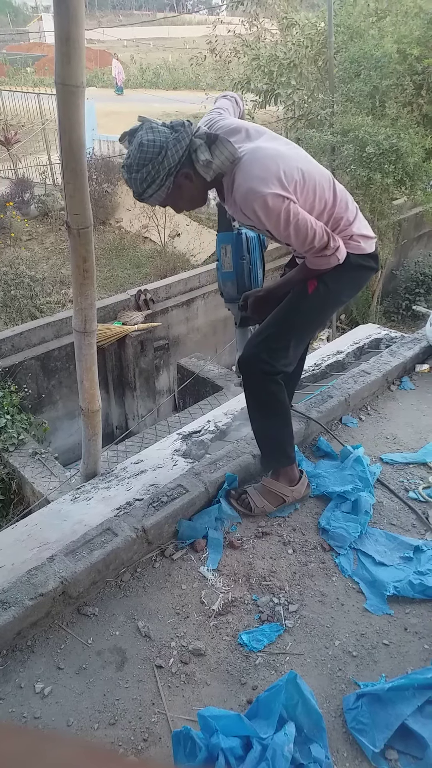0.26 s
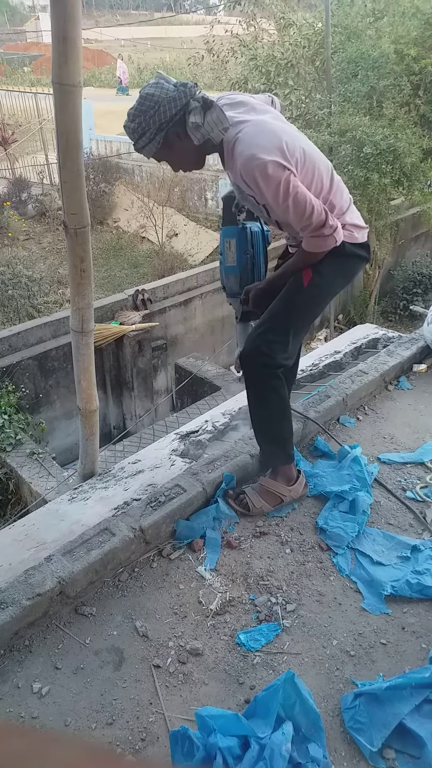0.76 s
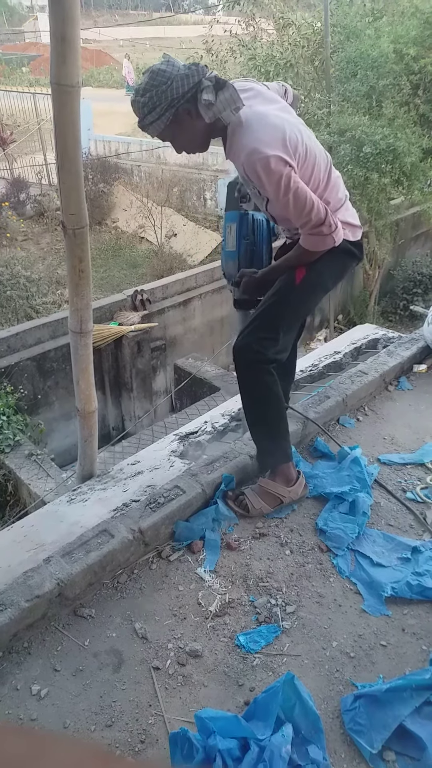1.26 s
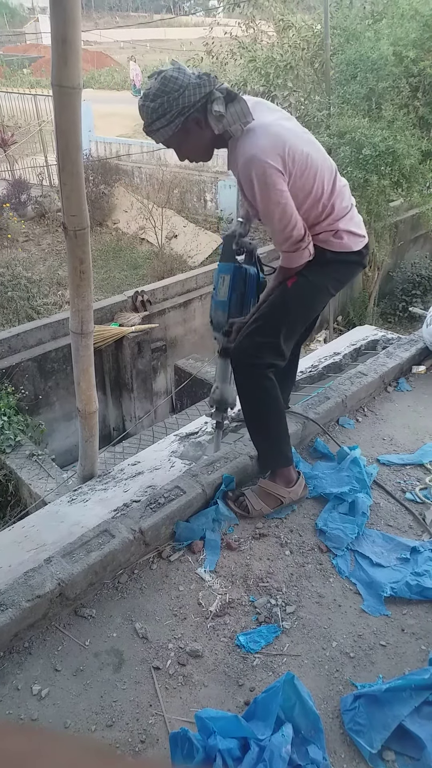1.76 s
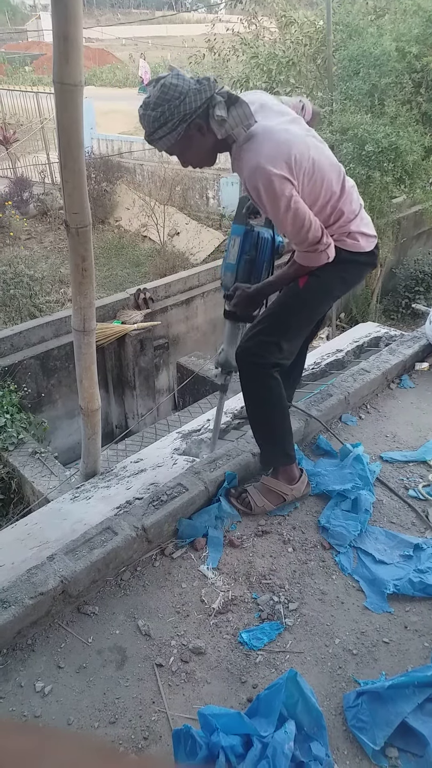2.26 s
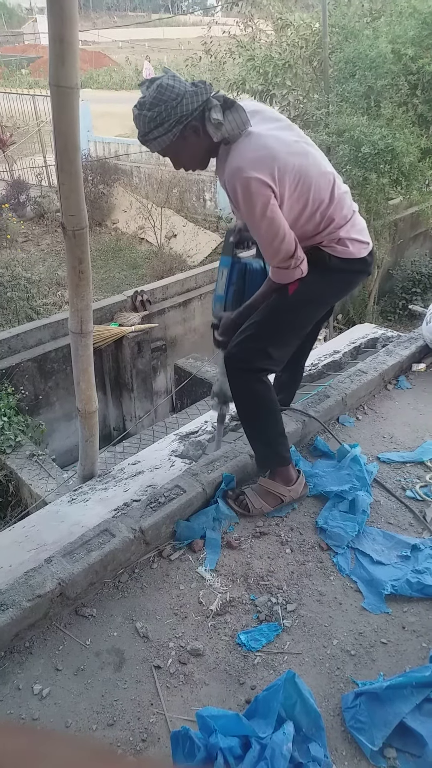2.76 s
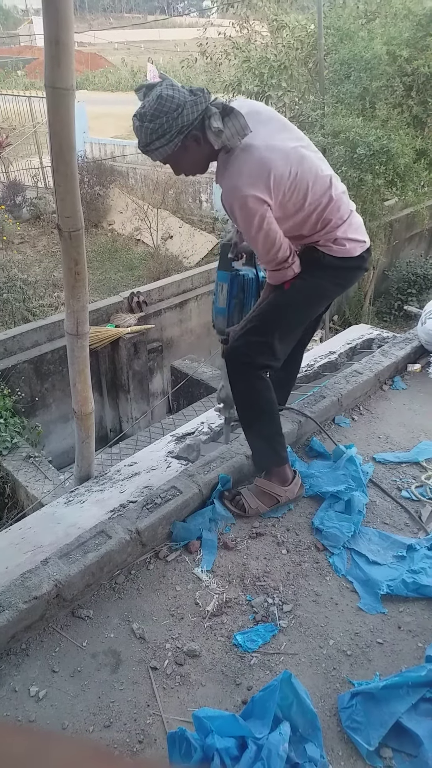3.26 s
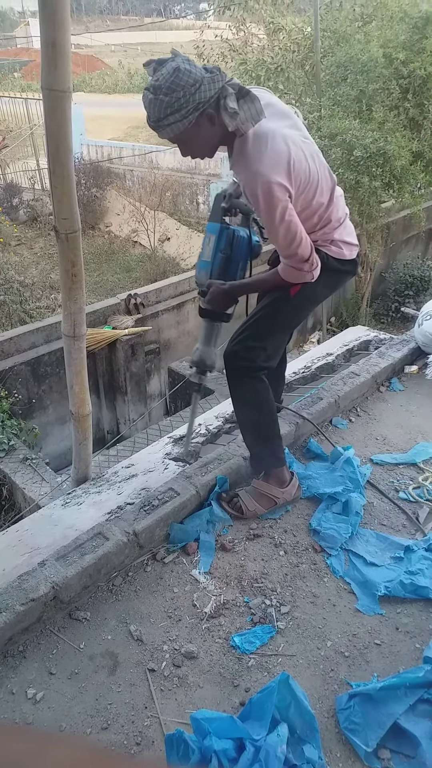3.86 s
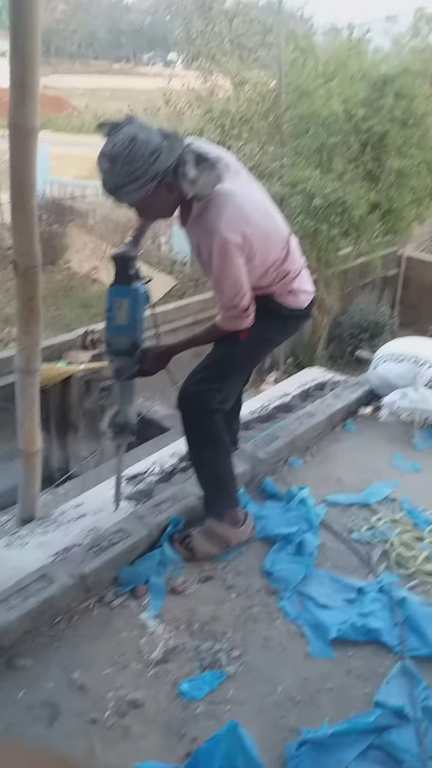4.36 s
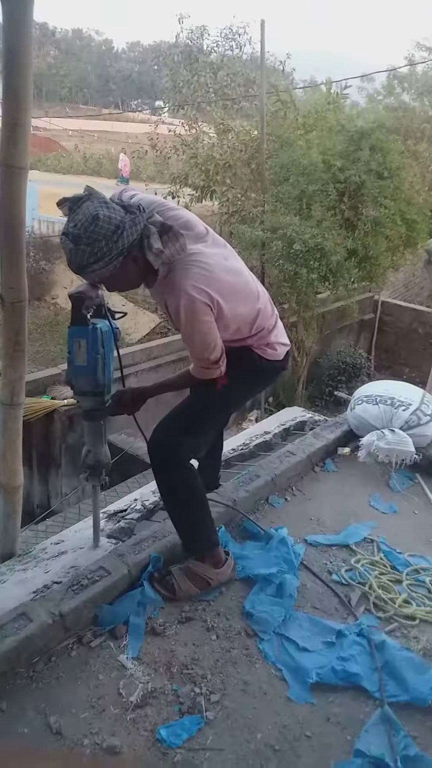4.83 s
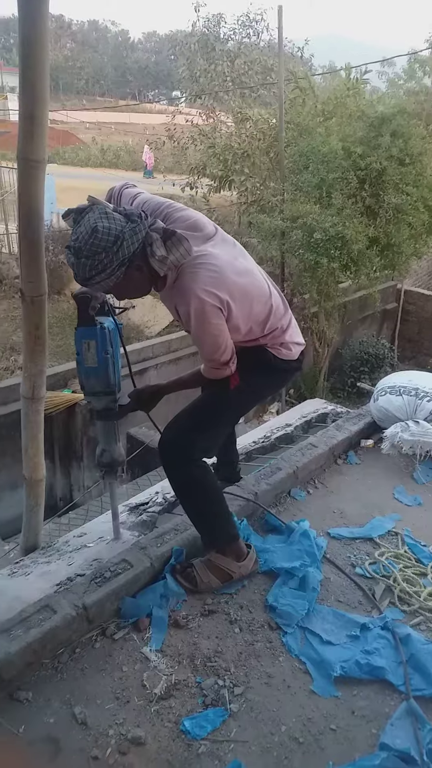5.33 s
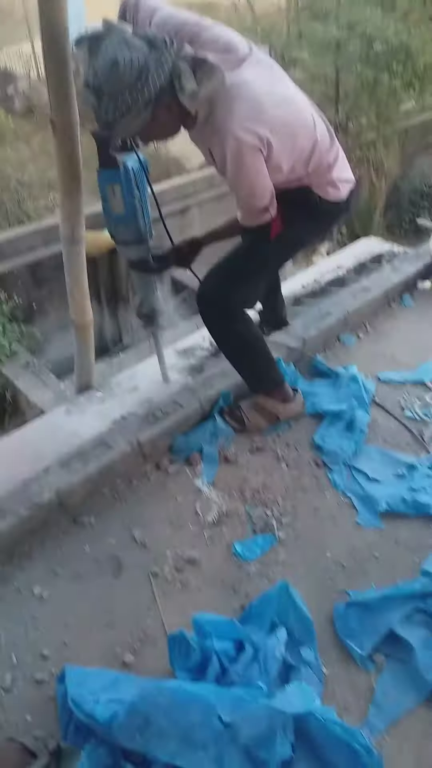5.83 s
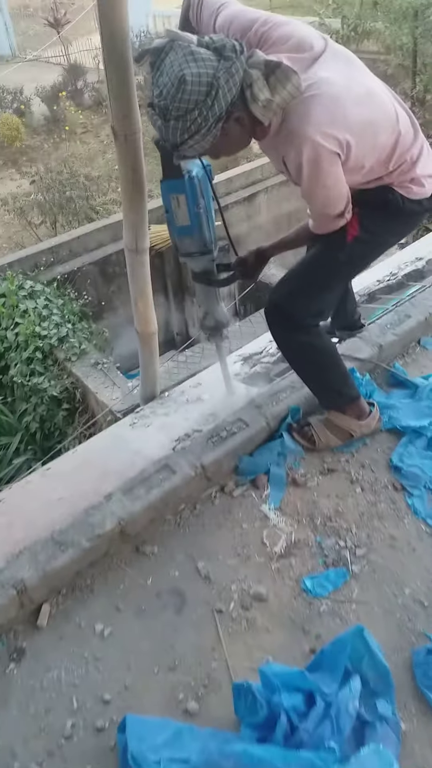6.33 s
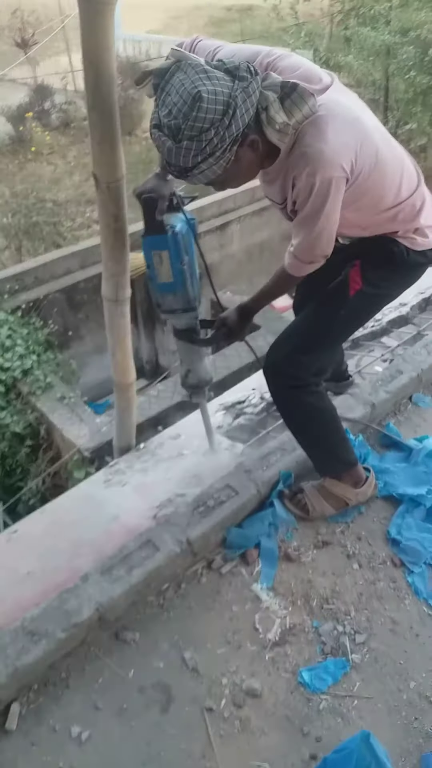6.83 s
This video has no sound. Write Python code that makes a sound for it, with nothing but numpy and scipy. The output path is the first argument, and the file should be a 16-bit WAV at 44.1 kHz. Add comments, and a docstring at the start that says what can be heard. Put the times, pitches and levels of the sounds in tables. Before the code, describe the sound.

An electric demolition hammer pounds concrete in a rapid burst, coasts down, its chisel scrapes rubble, then hammering restarts with ringing steel.

```python
"""Outdoors on a building site, an electric demolition hammer breaks a concrete beam, two metres from a phone.
Piston blows crack the concrete (bursts of noise), thud through the beam and ring the steel chisel (fading tones).
The motor (rattling noise) coasts down, then the chisel levers and scrapes rubble loose (grainy noise and rumble).
A short squeak and some hard ticks join in, rubble settles faintly, and hammering starts again at a new spot."""
import sys
import numpy as np
from scipy import signal
from scipy.fft import rfft, irfft
from scipy.io import wavfile
from scipy.ndimage import uniform_filter1d

SR = 44100
rng = np.random.default_rng(int(sys.argv[2]) if len(sys.argv) > 2 else 0)


def int16_out(signal):
    """Quantize to a 16-bit WAV file."""
    q = np.round(np.clip(np.atleast_2d(signal).T, -1, 1) * 32767)
    wavfile.write(sys.argv[1], SR, q.astype(np.int16))


N = 312925
T = np.arange(N) / SR


def undb(db):
    """Turn decibels into a plain factor."""
    return 10 ** (np.asarray(db) / 20)


def noise(spectrum, lo_hz=0., hi_hz=1e5):
    """Noise of a given colour, rms 1 over the whole colour, optionally only one band of it."""
    hz = np.maximum(np.arange(N // 2 + 1) * SR / N, 1)
    points, db = np.transpose(spectrum)
    gain = undb(np.interp(np.log(hz), np.log(points), db))
    gain = gain / np.sqrt(np.mean(gain ** 2))
    gain = gain * (hz >= lo_hz) * (hz < hi_hz)
    return irfft(rfft(rng.standard_normal(N)) * gain, N)


def resonate(x, peaks):
    """Sum of resonances that each favour one pitch, scaled to keep the rms."""
    y = sum(undb(db) * signal.lfilter(*signal.iirpeak(hz, hz / width, SR), x) for hz, width, db in peaks)
    return y * np.std(x) / np.std(y)


def spikes(s, size):
    """Impulses of given sizes at given times in seconds."""
    return np.bincount(np.clip(np.asarray(s) * SR, 0, N - 1).astype(int), size, N)


def fade(x, t60, rise=0.0001):
    """Each impulse becomes an envelope that rises fast and dies by 60 dB in t60 seconds."""
    decay = signal.lfilter([1], [1, -1000 ** (-1 / (t60 * SR))], x)
    a = np.exp(-1 / (rise * SR))
    return signal.lfilter([1 - a], [1, -a], decay)


def grains(rate, spread_db, t60):
    """Envelope of scattered small fragments (rate per second) of very unequal size, rms 1."""
    size = undb(spread_db * np.minimum(rng.exponential(size=N), 4))
    hit = (rng.random(N) < rate / SR) * size
    env = fade(hit, t60)
    return env / np.sqrt(np.mean(env ** 2))


# colour of the steady site noise: f/Hz, level/dB (per Hz, relative)
SITE_COLOUR = [(40, -27), (70, -3.5), (900, -15), (7000, -28), (9000, -39), (15800, -25)]


def site_noise():
    """Soft, steady noise of the site, strongest in the bass and the middle."""
    return undb(-53.5) * noise(SITE_COLOUR)


# loudness of motor and gears, and from 2.1 to 4.63 s of faint settling rubble: t/s, level/dB (relative)
WHIRR_LEVEL = [(.47, -14.5), (.6, -22), (.84, -28), (1.15, -29.5), (1.7, -39.5), (1.95, -41), (2.1, -57.5),
               (4.63, -43.5), (4.638, -18), (4.72, -13), (5.25, -18), (5.45, -21), (5.75, -18),
               (7.1, -14.5)]
# resonances of the motor housing: f/Hz, width/Hz, level/dB (relative)
HOUSING_MODES = [(1900, 260, 5), (3350, 550, 7.5), (3950, 350, 6), (5050, 450, 5.5), (6700, 400, 2)]
# idle piston strokes while the motor coasts: t/s, level/dB (relative)
IDLE_STROKES = [(0.603, -25), (0.658, -12), (0.7146, -2), (0.7751, -30), (0.833, 4), (1.1728, -4),
                (1.202, -32), (1.259, -9), (1.3304, -31), (1.4067, -38), (1.49, -12), (1.5743, -14),
                (1.6823, -13), (1.762, 0.5), (1.804, -10), (1.961, -9.5), (2.23, -14)]


def motor(blow_s, throb=0.57, tick_t60=0.0071, swell_db=-22.5):
    """Rattly gear whirr in the housing; it swells after each idle stroke, hushes before a stroke or blow."""
    s, db = np.transpose(IDLE_STROKES)
    strokes = spikes(s, undb(db))
    # the last, far-off time keeps the motor from hushing at the end
    every = np.sort(np.concatenate([s, blow_s, [2 * N / SR]]))
    to_next = every[np.searchsorted(every, T)] - T
    hush = 1 - throb * np.exp(-(to_next / 0.013) ** 2)
    # from 2.1 to 4.63 s the same rattle stands for faint settling rubble
    level = undb(np.interp(T, *np.transpose(WHIRR_LEVEL)))
    level = level + undb(swell_db) * fade(strokes, 0.058, rise=0.0016)
    rattle = rng.standard_normal(N) * (0.28 + 0.3 * grains(130, 1.5, 0.039))
    whirr = (resonate(rattle, HOUSING_MODES) + 0.22 * noise(GRIT_COLOUR)) * hush * level
    ticks = undb(-21.0) * noise(GRIT_COLOUR) * fade(strokes, tick_t60)
    # the closed housing keeps the top in
    return signal.sosfilt(signal.butter(3, 7200., fs=SR, output="sos"), whirr + ticks)


# gliding squeak as steel slips on stone: t/s, f/Hz, level/dB (relative)
SQUEAK_GLIDE = [(2.365, 6700, -87), (2.377, 6720, -30), (2.41, 6900, -32)]


def squeak():
    """Steel catches and slips on stone: a gliding tone with its octave, unsteady in level."""
    s, hz, db = np.transpose(SQUEAK_GLIDE)
    phase = 2 * np.pi * np.cumsum(np.interp(T, s, hz)) / SR
    tone = np.sqrt(2) * (np.sin(phase) + 0.73 * np.sin(2 * phase))
    level = undb(np.interp(T, s, db, -120, -120))
    catch_and_slip = uniform_filter1d(grains(250, 3.0, .03), size=88)
    return level * tone * catch_and_slip


# hard ticks of steel and stone, and at 4.636 s the clack of the hammer's trigger: t/s, f/Hz, level/dB
# (relative), t60/s (time to fade by 60 dB)
HARD_TICKS = [(2.425, 5000, -8, 0.021), (4.636, 5430, 0.5, 0.011), (4.817, 3730, 1, 0.021)]


def hard_ticks():
    """Steel and stone click together, and the trigger clacks: short tones that fade at once."""
    out = 0
    for at, pitch, level_db, t60 in HARD_TICKS:
        env = fade(spikes([at], [undb(level_db)]), t60, rise=0.00015)
        out = out + env * np.sin(2 * np.pi * pitch * T)
    return out


# colour of grinding grit, also used for the motor: f/Hz, level/dB (per Hz, relative)
GRIT_COLOUR = [(410, 0), (700, -7.5), (2150, 0), (2980, -4), (5220, 2), (7320, -5.5), (8900, -29),
               (15800, -20.5)]
# colour of the beam's rumble under the scraping: f/Hz, level/dB (per Hz, relative)
RUMBLE_COLOUR = [(29, -43), (50, -39), (117, -4.5), (243, -13.5), (289, -2), (340, -8), (1000, -19.5),
                 (1300, -76), (2200, -120)]
# chisel levering and scraping in rubble, a row for each shove:
# start t/s, peak t/s, grit level/dB, rumble level/dB (both relative), fall/(dB per s)
SCRAPE_SHOVES = [(2.193, 2.38, -39, -51, 205), (2.405, 2.405, -25, -35.5, 61),
                 (2.45, 2.527, -27.5, -41.5, 163), (2.692, 2.806, -17, -25, 82.5),
                 (3.068, 3.185, -16, -24, 118), (3.287, 3.3, -29, -37, 200),
                 (3.345, 3.37, -14, -20.5, 50.5), (3.819, 3.835, -14, -18, 53.5),
                 (4.145, 4.167, -24, -31, 85), (4.555, 4.58, -43, -60, 40)]


def scrape(rise_power=0.84):
    """Grit grinds in dense grains over a lumpy rumble of the beam, both growing and fading with each shove."""
    out = 0
    grit = noise(GRIT_COLOUR) * (0.66 + 0.28 * grains(1100, 4.5, 0.012))
    rumble = noise(RUMBLE_COLOUR) * (1.4 + .5 * grains(80, 5.2, 0.083))
    for start, peak, grit_db, rumble_db, fall in SCRAPE_SHOVES:
        rise = np.clip((T - start) / (peak - start), 0, 1) ** rise_power
        lost_db = fall * np.maximum(T - peak, 0)
        out = out + rise * (grit * undb(grit_db - lost_db) + rumble * undb(rumble_db - lost_db))
    return out


def beam_answer(modes, swell_s=0.0023, knock_db=-8.5, knock_t60=0.33):
    """What one spot of the beam returns to every blow alike: a dense knock, and modes that swell in late."""
    t = np.arange(SR // 3) / SR
    hz, width, db = np.transpose(modes)[:, :, None]
    # a wide mode dies fast
    tones = np.sin(2 * np.pi * (hz * t + rng.random(hz.shape))) * np.exp(-np.pi * width * t)
    late_modes = (1 - np.exp(-t / swell_s)) * np.sum(undb(db) * tones, axis=0)
    band = signal.butter(2, (500., 1900.), "band", fs=SR, output="sos")
    dense = signal.sosfilt(band, rng.standard_normal(len(t)))
    return late_modes + undb(knock_db) * dense * 1000 ** (-t / knock_t60)


MOVED_S = 4.5  # the blows after this time land on the second spot
# beam modes where the chisel stands first: f/Hz, width/Hz, level/dB (relative)
BEAM_FIRST_SPOT = [(73, 38, -4), (119, 34, -2), (181, 63, -1.5), (288, 12, 3), (498, 63, -2.5),
                   (560, 25, -9), (750, 35, -12), (6960, 70, 0)]
# beam modes at the second spot: f/Hz, width/Hz, level/dB (relative)
BEAM_SECOND_SPOT = [(75.6, 78, -15.5), (116, 37, -5), (174, 21.6, 0.5), (252, 82, -3.5), (329.6, 39, -4.5),
                    (430, 17, -3), (607.6, 15, -8), (824, 9.5, -8)]
# pitch of the one-cycle push at the first and the second spot: f/Hz
SPOT_PUSH_HZ = (800, 1190)
# thud, added to each blow's own crack level: t/s, level/dB
THUD_LEVEL = [(1.1, -16), (4.64, -40.5), (4.72, -15.5), (7.1, -17)]
# push, added to each blow's own crack level: t/s, level/dB
PUSH_LEVEL = [(1.1, -13), (5.2, -14), (5.3, -3), (6.5, -6), (7.1, -10)]


def thud(s, crack_db, shake_db=0.0, t60=0.17):
    """A one-cycle push, then the beam's answer to each blow, with some loose shaking on top."""
    out = 0
    thud_db = crack_db + np.interp(s, *np.transpose(THUD_LEVEL))
    push_db = crack_db + np.interp(s, *np.transpose(PUSH_LEVEL))
    t = np.arange(128) / SR - .0012
    lead_s = .0015  # the push is heard just before the crack
    spots = zip((BEAM_FIRST_SPOT, BEAM_SECOND_SPOT), SPOT_PUSH_HZ, (s < MOVED_S, s > MOVED_S))
    for modes, push_hz, here in spots:
        hits = spikes(s, undb(thud_db) * here)
        answer = signal.fftconvolve(hits, beam_answer(modes))[:N]
        shake = resonate(rng.standard_normal(N) * fade(hits, t60, rise=0.02), modes)
        cycle = -np.sin(2 * np.pi * push_hz * t) * np.exp(-3 * (t * push_hz) ** 2)
        push = np.convolve(spikes(s - lead_s, undb(push_db) * here), cycle)[:N]
        out = out + answer + undb(shake_db) * shake + push
    return out


# chisel modes that every blow rings: f/Hz, level/dB (relative)
CHISEL_MODES = [(7445, 0), (7547, -9), (12450, -25), (15600, -21)]
# chisel modes of bending: f/Hz, level/dB (relative)
BENDING_MODES = [(4905, 0), (5075, -5), (10720, -14)]
# level of the chisel's bending modes over time, added to each blow's own crack level: t/s, level/dB
BENDING_LEVEL = [(.42, -23), (.472, -13), (.6, -28), (.85, -31.5), (1.0, -26), (1.07, -11), (2.4, -30),
                 (3.0, -30), (3.11, -12), (3.15, -28), (4.2, -24), (4.72, -14), (5.6, -19), (5.8, -36),
                 (6.15, -43), (6.3, -26), (6.65, -20)]


def ring(s, crack_db, ring_db, free_s, t60=0.63, pressed=0.24, choke_s=0.00073, swell_s=0.0034,
         late_s=0.0072, bending_t60=0.6):
    """The chisel's modes ring while it is off the stone, drop when it lands and stop at the next blow."""
    out = np.zeros(N + SR)
    scatter_db, bending_scatter_db = 2.5, 4.
    hz, mode_db = np.transpose(CHISEL_MODES + BENDING_MODES)[:, :, None]
    is_bending = (np.arange(len(hz)) >= len(CHISEL_MODES))[:, None]
    bending_db = crack_db + np.interp(s, *np.transpose(BENDING_LEVEL))
    chance = rng.standard_normal((len(s), 3, len(hz), 1))
    for k, gap in enumerate(np.diff(np.append(s, N / SR))):
        t = np.arange(int(min(gap + 4 * choke_s, .3) * SR)) / SR
        stopped = np.exp(-np.maximum(t - gap, 0) / choke_s)
        env = (1 - np.exp(-t / swell_s)) * stopped * 1000 ** (-t / t60)
        # once landed, only the pressed share goes on for a while
        landed = np.maximum(t - free_s[k], 0)
        env = env * (pressed * np.exp(-landed / 0.073) + (1 - pressed) * np.exp(-landed / choke_s))
        first_modes_db = ring_db[k] + scatter_db * chance[k, 0]
        bending_modes_db = bending_db[k] + bending_scatter_db * chance[k, 0]
        db = np.where(is_bending, bending_modes_db, first_modes_db)
        tone = np.sin(2 * np.pi * hz * (1 + 0.0024 * chance[k, 1]) * t + np.pi * chance[k, 2])
        # bending builds slowly
        late = np.where(is_bending, (1 - np.exp(-(t / late_s) ** 2)) * 1000 ** (-t / bending_t60), 1)
        start = int(s[k] * SR)
        out[start:start + len(t)] += env * np.sum(undb(db + mode_db) * late * tone, axis=0)
    # the shank chatters in its holder, so the ring flutters
    return out[:N] * (.8 + .35 * grains(150, 2.5, .04))


# colour of cracking concrete: f/Hz, level/dB (per Hz, relative)
CRACK_COLOUR = [(240, -27), (400, 1), (553, -2.5), (2460, -2.5), (4980, -2), (6570, -3.5), (7440, -1),
                (9080, -25.5), (12200, -11), (15800, -10.5)]
# how long the body of the crack lasts: f/Hz, t60/s (time to fade by 60 dB)
CRACK_FADE = [(700, 0.1), (3000, 0.082), (12000, 0.15)]


def crack(s, db, bounce_db=-10.5, patchy_db=1.8, snap_db=-1.0, snap_t60=0.01, rise=0.00013,
          dull_db=19.0, short_db=8.0, clack_t60=0.035):
    """Concrete splinters: a snap and a burst in every octave, of changing colour, renewed by a bounce."""
    out = 0
    bounce = rng.random((len(s), 2)).T
    bounce_s = s + 0.00657 + 0.009 * bounce[0]
    # knocks by hand, without the piston, are duller and shorter
    by_hand = (s > 2) & (s < MOVED_S)
    body = np.where((T > 2) & (T < MOVED_S), undb(-short_db), 1)
    fade_hz, fade_t60 = np.transpose(CRACK_FADE)
    for octave in range(6):
        lo = 375 * 2. ** octave
        dull = dull_db * by_hand * (octave > 4)  # only the top octave is dulled
        size = undb(db - dull + patchy_db * rng.standard_normal(len(s)))
        hits = spikes(s, size) + spikes(bounce_s, size * undb(bounce_db) * (.5 + bounce[1]))
        t60 = np.interp(np.log(lo), np.log(fade_hz), fade_t60)
        burst = fade(hits * body, t60, rise)
        snap = undb(snap_db) * fade(hits, snap_t60, rise)
        clack = fade(hits * (1 - body), clack_t60, rise)  # in place of the lost body
        out = out + noise(CRACK_COLOUR, lo, 2 * lo) * (burst + snap + clack)
    return out * (.7 + .4 * grains(900, 3.0, .004))


# bursts at full speed; a row falls on a blow and the piston strikes evenly up to the next row:
# t/s, crack level/dB, steel ring level/dB (both relative), free ringing t/s
BURST_MARKS = [
    [(0.004, 1, -16.5, 0.041), (0.135, -1, -11.5, 0.023), (0.423, 0.5, -17, 0.047)],
    [(5.001, 2, -6.5, 0.032), (5.172, -3, -5, 0.086), (5.338, 0, -10.5, 0.019), (5.498, -3, -9, 0.055),
     (5.674, 1, -13.5, 0.024), (6.2485, 1.5, -17, 0.028), (6.375, 1.5, -14, 0.036),
     (6.638, 1.5, -13, 0.024), (7.0625, 0.5, -14, 0.016)],
]
# around these times the blows bury the chisel tip: t/s
BURIED_TIMES = [.135, .301, 5.044, 5.296, 5.417, 5.961, 6.085, 6.125, 6.247, 6.55, 6.638]


def bursts(blows_per_s=23.8, uneven_s=.0007, uneven_db=.8, uneven_free=0.24):
    """The piston strikes almost evenly; every blow of the bursts becomes a row like the single blows."""
    rows = []
    for marks in map(np.array, BURST_MARKS):
        steps = np.round(np.diff(marks[:, 0]) * blows_per_s)
        number = np.append(0, np.cumsum(steps))
        every = np.arange(number[-1] + 1)
        rows += zip(*(np.interp(every, number, column) for column in marks.T))
    s, crack_db, ring_db, free_s = np.transpose(rows)
    # a buried tip cracks harder and hardly rings
    buried = np.min(abs(s[:, None] - BURIED_TIMES), axis=1) < .5 / blows_per_s
    chance = rng.standard_normal((len(s), 3)).T
    crack_db = crack_db + uneven_db * chance[1] + 1 * buried
    ring_db = ring_db - 7 * buried
    free_s = free_s * np.exp(uneven_free * chance[2])
    return np.transpose([s + uneven_s * chance[0], crack_db, ring_db, free_s])


# single blows as the motor slows or gathers speed, and knocks by hand:
# t/s, crack level/dB, steel ring level/dB (both relative), free ringing t/s
SINGLE_BLOWS = [(0.4715, -2, -18.5, 0.071), (0.8474, -1, -14.5, 0.038), (0.9062, -2.5, -15.5, 0.082),
                (0.9822, -3, -14, 0.036), (1.071, -7, -15, 0.04), (2.4085, -12.5, -45, 0.032),
                (2.4223, -13, -26, 0.037), (2.502, 0, -47, 0.032), (2.5296, -7, -49, 0.024),
                (3.1103, -4.5, -14.5, 0.014), (3.149, -7, -45, 0.011), (3.1563, -8, -13, 0.012),
                (3.2305, -1, -44, 0.025), (3.312, -10, -49, 0.02), (4.164, -12, -45, 0.02),
                (4.175, -8, -45, 0.02), (4.2004, -4, -21.5, 0.03), (4.2444, -7, -32, 0.012),
                (4.6359, -16, -54, 0.023), (4.7247, 0.5, -4, 0.054), (4.79, 0.5, -8.5, 0.047),
                (4.843, -5, -7.5, 0.041), (4.8933, -1, -2, 0.025), (4.9386, -3, -4, 0.046),
                (4.976, -5, -17, 0.032)]


def scene():
    """All blows in order of time, with motor, scraping, small sounds and the site around them."""
    rows = np.vstack([SINGLE_BLOWS, bursts()])
    s, crack_db, ring_db, free_s = rows[np.argsort(rows[:, 0])].T
    background = site_noise() + motor(s) + squeak() + hard_ticks() + scrape()
    steel = ring(s, crack_db, ring_db, free_s)
    blows = thud(s, crack_db) + steel + undb(-11.5) * crack(s, crack_db)
    return (background + blows)[None]


def record(dry):
    """The phone loses the deep bass, rounds the loudest peaks and cuts the top."""
    thin = signal.sosfilt(signal.butter(6, 50., "high", fs=SR, output="sos"), dry)
    rounded = np.tanh(thin)
    return signal.sosfilt(signal.ellip(10, .2, 85, 15900, fs=SR, output="sos"), rounded)


dry = scene()
out = record(dry)
int16_out(out)
```